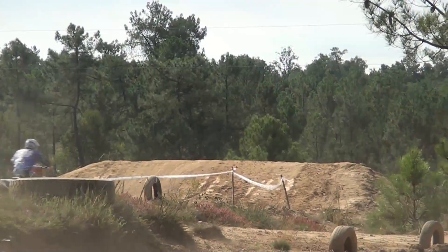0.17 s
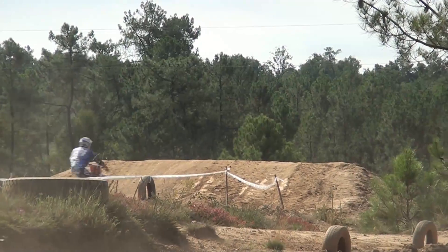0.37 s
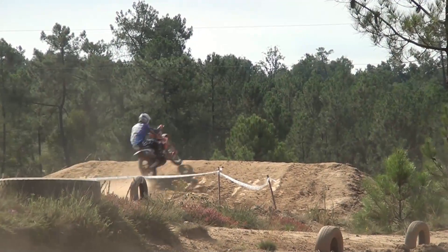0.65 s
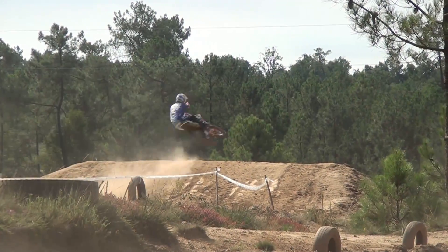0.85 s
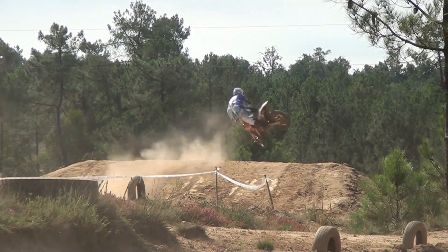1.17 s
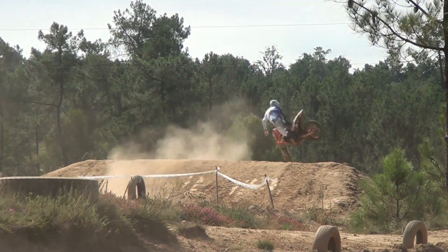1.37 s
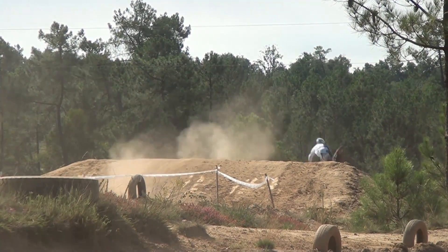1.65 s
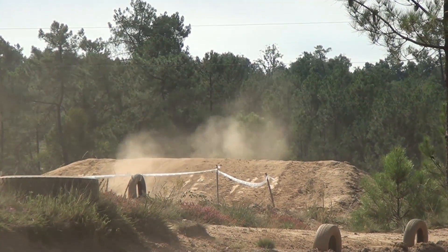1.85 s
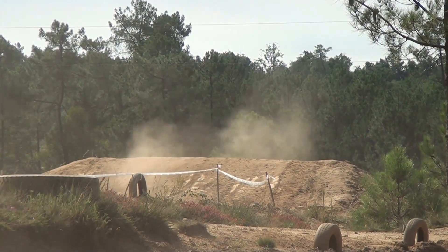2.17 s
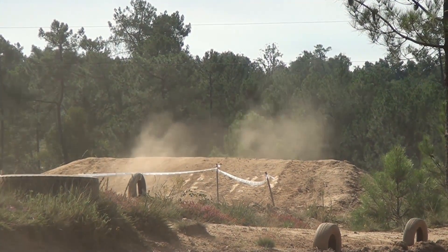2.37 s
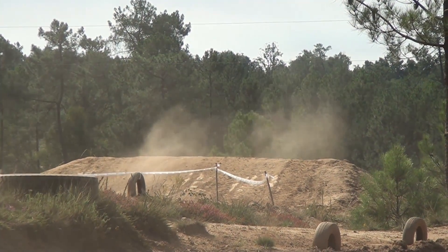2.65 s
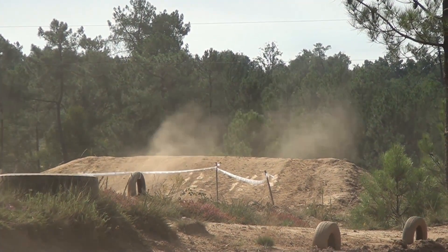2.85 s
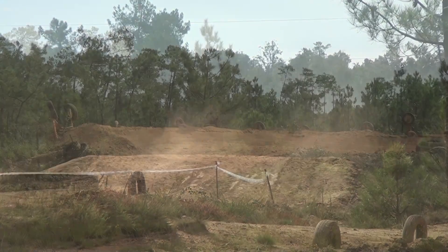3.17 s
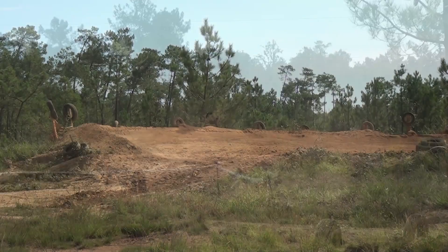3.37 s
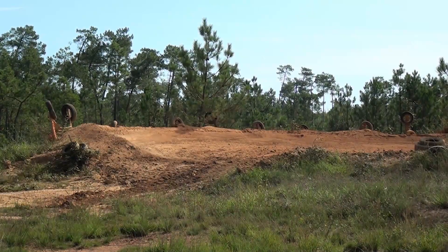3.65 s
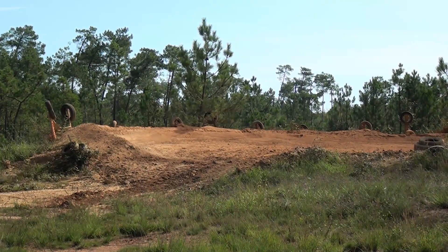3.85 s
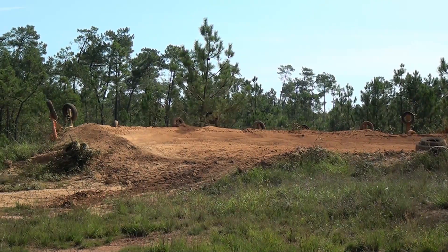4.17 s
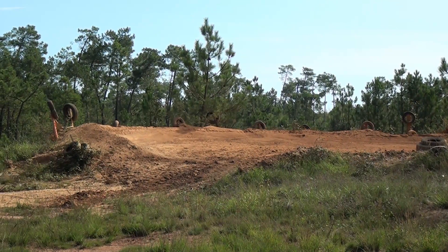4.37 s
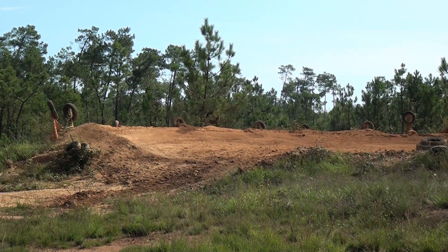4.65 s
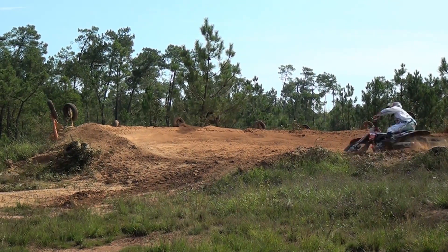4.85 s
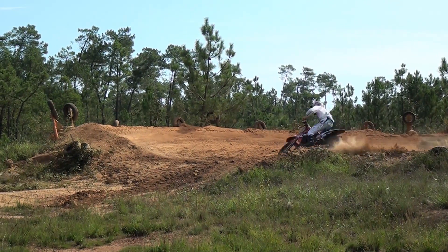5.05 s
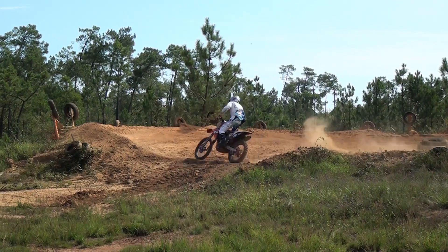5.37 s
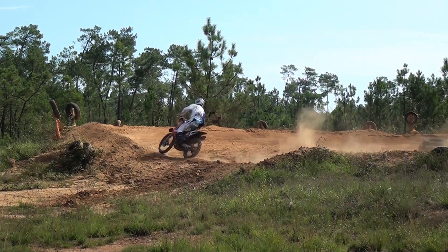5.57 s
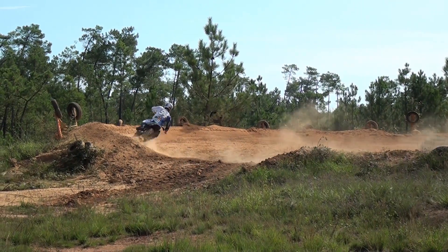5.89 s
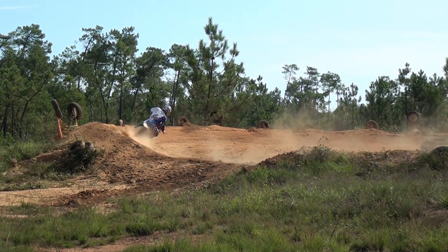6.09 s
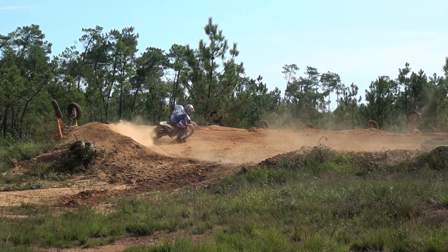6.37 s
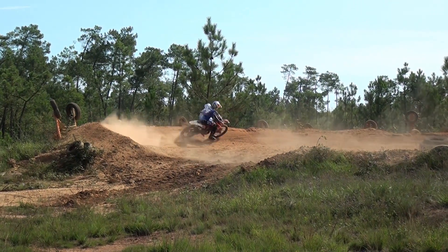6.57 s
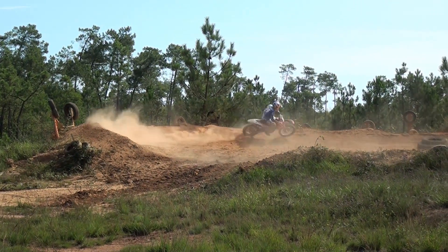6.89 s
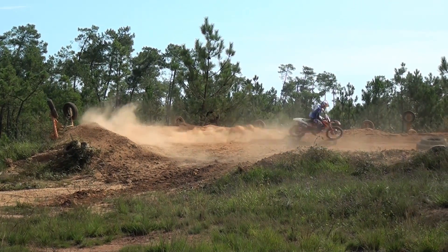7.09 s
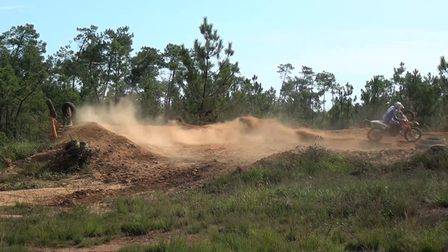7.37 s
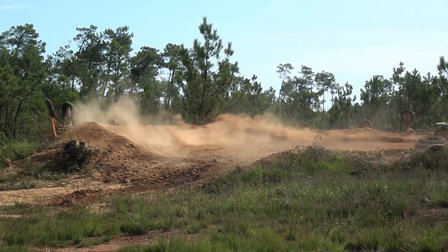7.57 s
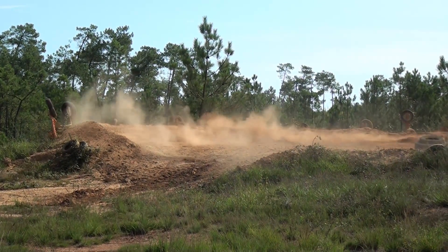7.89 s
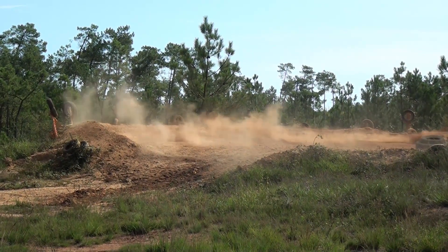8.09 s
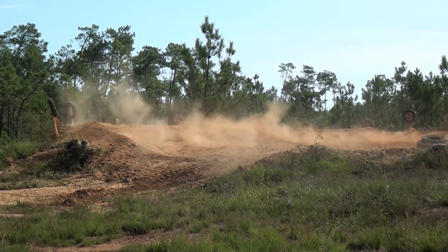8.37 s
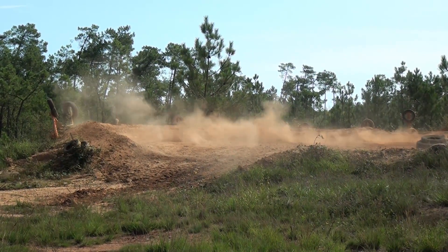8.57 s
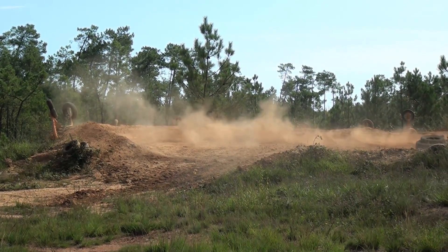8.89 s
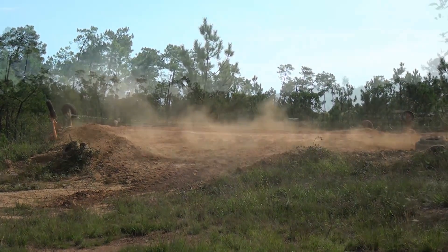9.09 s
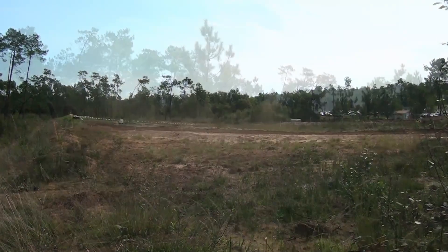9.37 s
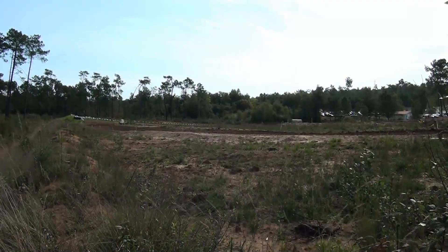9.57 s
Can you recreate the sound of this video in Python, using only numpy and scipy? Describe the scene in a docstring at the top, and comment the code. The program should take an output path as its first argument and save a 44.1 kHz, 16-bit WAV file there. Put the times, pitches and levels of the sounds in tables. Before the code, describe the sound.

A motocross bike passes outdoors in short throttle bursts, drops to a low rattling putter, then accelerates with a crackling rasp.

```python
"""A sandy track among pines, from a camera's stereo microphone: a single-cylinder dirt bike passes three times.
Every firing rings the exhaust pipe; with the throttle open it also cracks. Chain, tyres and thrown sand hiss,
and chain slaps and stones rattle. Under it all the engine's low hum holds steady with a light airy hiss; low
gusts rumble on the microphone."""
import sys
import numpy as np
from scipy import signal
from scipy.fft import rfft, irfft, next_fast_len
from scipy.io import wavfile
from scipy.ndimage import uniform_filter1d

SR = 44100
rng = np.random.default_rng(int(sys.argv[2]) if len(sys.argv) > 2 else 0)


def unload_audio(sound):
    """Save the sound as a 16-bit wav file, at the path given as the first command line argument."""
    columns = np.transpose(np.atleast_2d(sound))
    # keep every value between -1 and 1, then stretch to whole-number steps
    steps = np.round(np.clip(columns, -1, 1) * 32767)
    wavfile.write(sys.argv[1], SR, steps.astype(np.int16))


N = 429093


def gain_of(db):
    """Decibels to a factor."""
    return 10 ** (np.asarray(db) / 20)


def read(points, hz):
    """Reads a spectrum on a log-frequency axis."""
    f, value = np.transpose(points)
    return np.interp(np.log(hz + 1), np.log(f + 1), value)


def columns(rows, t):
    """Each column after the time column as a curve over t."""
    times, *rest = np.transpose(rows)
    return [np.interp(t, times, column) for column in rest]


def smooth(x, size):
    """Two running means of size samples."""
    return uniform_filter1d(uniform_filter1d(x, size), size)


def steady(x, size=6000):
    """Holds the running rms at 1 but keeps pulse-to-pulse differences."""
    return x / np.sqrt(abs(smooth(x ** 2, size)) + 1e-16)


def swelling(x, hold):
    """Level near 1; hold 0 keeps all of the slow swell, hold 1 none."""
    x = x / x.std()
    return x * abs(steady(x) / (x + 1e-30)) ** hold


def butter(x, order, hz, kind):
    """Causal Butterworth filter."""
    return signal.sosfilt(signal.butter(order, hz, kind, fs=SR, output="sos"), x)


def colour(x, points):
    """Causal filter with the given spectrum."""
    db = np.maximum(read(points, abs(np.fft.fftfreq(4096, 1 / SR))), -100)
    minimum_phase = np.exp(np.conj(signal.hilbert(np.log(gain_of(db)))))
    return signal.oaconvolve(x, np.fft.ifft(minimum_phase).real[:2048])[:len(x)]


def mode(x, hz, width_hz, db=0, count=2):
    """A fixed resonance; count 1 starts sharply, count 2 has steeper sides."""
    r = np.exp(-np.pi * width_hz / SR)
    section = [1 - r, 0, r - 1, 1, -2 * r * np.cos(2 * np.pi * hz / SR), r * r]
    return gain_of(db) * signal.sosfilt([section] * count, x)


def resonate(x, hz, width_hz, rise=6.4):
    """A resonance that follows hz and builds up rise times faster than it dies."""
    turn = np.exp(2j * np.pi * np.cumsum(hz) / SR)
    slow, fast = np.exp(-np.pi * width_hz * np.array([1, rise]) / SR)
    envelope = signal.lfilter([(1 - slow) * (1 - fast)], np.poly([slow, fast]), x / turn + 1e-18)
    return 2 * (turn * envelope).real


def throttle_at(t, shut_voice):
    """The throttle snaps open and rolls shut; returns its share of cracks in the treble, then the voice."""
    # The engine pulls, lugs or spins free in the air. Boom, bark and buzz are the low, upper and silencer
    # modes against the main one; nasal and bite are tail pipe modes against the cracks:
    # start_s, end_s, crack_share, boom_db, bark_db, buzz_db, bark_hz, nasal_db, bite_db
    bursts = [(-.1, 0.238, 0.75, -0.5, 8, -1.5, 280, -26, -40),
              (0.956, 1.101, 0.97, -3.5, 1, -19, 271, -9.5, -18),
              (1.1, 1.24, 0.87, -4.5, -5, -16, 321, -13, -5),
              (1.285, 2.07, 0.62, -11.5, -3, -24, 293.1, -22, -14),
              (2.103, 2.286, 0.91, -2, -1, -11, 284.8, -8, -9),
              (2.296, 2.547, 0.19, 1, -8, -15.5, 310, -13, -30),
              (2.55, 2.762, 0.17, 0, 3.5, -31, 270, -12, -20),
              (5.176, 5.358, 0.65, 4, 3, -18, 266.7, -8, -20),
              (5.381, 5.678, 0.32, 5.5, 5.5, -20, 250, -11, -22),
              (5.716, 5.863, 0.36, 0, -12, -27, 256.2, -21, -28),
              (5.902, 6.046, 0.21, -3.5, -10, -18, 276.8, -24, -27),
              (6.088, 6.2, 0.7, 0.5, 4, -7, 233, -9, -23), (6.217, 6.408, 0.5, -4, 4.5, -5.5, 239, -3, -21),
              (6.412, 6.586, 0.74, -2, 3.5, -3.5, 265.4, -5, -28),
              (6.587, 6.747, 0.74, 0.5, 5.5, -0.5, 293.5, -8, -23),
              (6.763, 7.199, 0.78, -1, 4.5, -23, 294.8, -10.5, -25),
              (7.208, 7.78, 0.87, -4, 3, -17, 287, -12, -12),
              (7.779, 8.44, 0.69, -4, 2, -16, 289.5, -18, -14),
              (8.515, 8.737, 0.61, -1.5, 3, -16, 307.8, -11, -8),
              (8.762, 9.045, 0.48, -2, -1, -10.5, 266, -35, -10.5),
              (9.075, 9.339, 0.32, -4, 2, -10.5, 276.6, -25, -16),
              (9.362, 9.503, 0.28, -6, -5, -8.5, 274.8, -21, -12.5)]
    open_s, shut_s, coasting_share = .02, .05, .15
    start, end, *opened = np.transpose(bursts)[:, :, None]
    gate = np.clip((t - start) / open_s, 0, 1) * np.clip((end - t) / shut_s + 1, 0, 1)
    gate = gate / np.maximum(gate.sum(0), 1)
    share, *voice = (shut + ((value - shut) * gate).sum(0)
                     for shut, value in zip((coasting_share, *shut_voice), opened))
    return np.clip(share, 0, .98), *voice


def firings(t, hz, throttle):
    """One thump and one crack a cycle, uneven when the engine lugs; cracks vary more than thumps."""
    # The engine stumbles on a jolt: time_s, timing_spread_cycles
    stumbles = [(1.255, .06), (2.5, .045), (5.24, .025)]
    at = np.flatnonzero(np.diff(np.floor(np.cumsum(hz) / SR)))
    timing, strength, sharpness = rng.standard_normal((len(at), 3)).T
    lugging = np.clip((72 - hz[at]) / 25, 0, 1) * np.clip(1 - throttle[at] / .6, 0, 1)
    jolts = sum(spread * np.clip(1 - abs(t[at] - s) / .05, 0, 1) for s, spread in stumbles)
    jitter_cycles = .002 + .035 * lugging + jolts
    at = np.clip(at + (jitter_cycles * timing * SR / hz[at]).astype(int), 0, len(t) - 1)
    thumps, cracks = np.zeros((2, len(t)))
    thumps[at] = gain_of((.4 + 60 * jitter_cycles) * strength)
    # The crack leaves as the pressure wave peaks, later at high revs.
    late_s = .003 + .005 * np.clip((hz[at] - 62) / 14, 0, 1)
    cracks[np.minimum(at + (late_s * SR).astype(int), len(t) - 1)] = thumps[at] * gain_of(.8 * sharpness)
    return thumps, cracks


def main_ring(flow, hz, throttle, revving, noise):
    """The main pipe mode sags with the revs, rises with hot gas and locks to 2 * hz at high revs."""
    wander = 1 + .07 * steady(smooth(noise, 1200), size=40000)
    cold_hz = 163.6 * (hz / 31.5) ** .12 * wander
    warm_hz = cold_hz + (203 - cold_hz) * (throttle / 1.44) ** 2
    ring_hz = (1 - revving) * warm_hz + revving * 2 * hz
    fast_ring = steady(resonate(flow, ring_hz, width_hz=39.4))
    lug_ring = steady(resonate(flow, ring_hz, width_hz=47.3, rise=1.44))
    return revving * fast_ring + (1 - revving) * lug_ring


def exhaust_pipe(t, hz, throttle, thumps, noise, boom_db, bark_db, buzz_db, bark_hz):
    """Thumps ring the pipe and silencer; levels are set against the main mode."""
    # Upper engine orders that stand out clean: time_s, firing_rate_multiple, level_db
    upper_orders = [(0, 6.3, -6), (.3, 7, -19.5), (.95, 8, -21), (1.05, 7.5, -12), (1.22, 6.8, -13),
                    (1.3, 6.5, -18), (1.6, 6.6, -9), (2.05, 8, -14), (2.2, 7, -11), (2.35, 6, -20),
                    (2.8, 7, -27), (3.3, 9, -24), (5.15, 12, -28), (5.2, 12.3, -7), (5.33, 12, -1),
                    (5.5, 11.8, -3), (5.67, 11.3, -4), (5.73, 12, -32), (6.09, 14, -27), (6.12, 14, -10),
                    (6.3, 12.3, -10), (6.55, 11.5, -9), (6.74, 10.5, -11), (6.8, 7.5, -12), (7.2, 7, -15.5),
                    (7.3, 5.2, -9), (7.47, 5.5, -8), (7.62, 5.5, -6), (7.7, 7.5, -13), (7.8, 7, -18),
                    (7.9, 5.7, -10), (8.15, 6, -12), (8.25, 5.5, -8.5), (8.44, 5.5, -10), (8.5, 5.5, -13),
                    (8.66, 5.6, -9), (8.8, 6.5, -17), (9, 7, -18), (9.25, 6, -12), (9.5, 6, -16),
                    (9.73, 6, -16)]
    # Low pipe modes: pitch_hz, width_hz, level_db
    boom_modes = [(59.3, 21, -11), (92.4, 78, 15), (108.4, 41, 6)]
    # Thrum at the firing rate itself: time_s, level_db
    thrum_levels = [(0, -27), (3.3, -16), (3.6, -12), (4.2, -12), (4.6, -16), (5.1, -14), (5.5, -12),
                    (6.1, -27), (6.5, -18), (6.8, -6.5), (7.15, -9), (7.3, -26), (9.73, -12)]
    # Silencer modes: pitch_hz, width_hz, level_db
    silencer_modes = [(408, 65, 9.5), (485, 62, 17), (596, 29, 11), (647.3, 28, 15), (757, 86, 9)]
    flow = thumps + .0092 * noise[0]  # turbulence fills the gaps between harmonics
    revving = np.clip((hz - 54) / 10, 0, 1)
    pipe = main_ring(flow, hz, throttle, revving, noise[2])
    multiple, hum_db = columns(upper_orders, t)
    hum = resonate(thumps, multiple * hz, width_hz=162, rise=1.25)
    pipe += gain_of(hum_db) * steady(resonate(hum, multiple * hz, width_hz=162, rise=1.4))
    pipe += gain_of(columns(thrum_levels, t)[0]) * steady(resonate(resonate(flow, hz, 30), hz, 30))
    second_harmonic = steady(resonate(resonate(flow, 2 * hz, 25), 2 * hz, 27))
    pipe += gain_of(-15.5) * (1 - revving) * second_harmonic
    # Boom and bark swell as a harmonic crosses them.
    pipe -= gain_of(boom_db) * swelling(sum(mode(flow, *m) for m in boom_modes), hold=.39)
    bark = revving * resonate(flow / hz, bark_hz, 37) + (1 - revving) * resonate(flow / hz, bark_hz, 66)
    pipe -= gain_of(bark_db) * swelling(bark, hold=.083)
    buzz = sum((-1) ** k * mode(thumps + .003 * noise[1], *m) for k, m in enumerate(silencer_modes))
    pipe += gain_of(buzz_db) * steady(buzz)
    # At low revs each thump comes back off the bank about 8 ms later.
    return steady(pipe + .23 * (1 - revving) * np.roll(pipe, round(.0081 * SR)))


def cracks_and_hiss(throttle, cracks, noise, treble, bounce):
    """Exhaust cracks blend with the hiss of chain, tyres and sand; returns bands below and above 3 kHz."""
    # A gas jet follows each valve opening.
    jet = signal.lfilter([1], [1, -np.exp(-1 / (.003 * SR))], cracks) * noise[1]
    flicker = gain_of(2 * steady(uniform_filter1d(noise[0], size=700)))
    hiss = steady(noise[2] * flicker)
    dip_spacing_hz, echo_gain = bounce
    delay, bands = round(SR / dip_spacing_hz), []
    # Sand hiss rules the top band unless the throttle is wide open.
    for share, crack_gain, kind in (throttle, 11, "low"), (throttle ** 2, 6, "high"):
        drive = np.sqrt(share) * steady(jet - crack_gain * cracks) + np.sqrt(1 - share) * hiss
        drive[delay:] -= echo_gain * drive[:-delay]  # the sand returns an inverted echo
        bands.append(steady(butter(colour(drive, treble), 3, 3000, kind)))
    return bands


def tail_pipe(t, cracks, low_band, noise, modes, nasal_db, bite_db):
    """Cracks ring the tail pipe: three fixed modes and a moving snarl, also fed by the low band."""
    # The loudest tail pipe mode, shifting with the bike's heading: time_s, pitch_hz, level_db
    snarl_path = [(0.0, 1700, -13), (0.13, 1820, -5), (0.27, 1500, -15), (0.7, 1770, -8), (0.81, 2120, -6),
                  (1.05, 1649, -5.5), (1.3, 2083, -6), (1.32, 1770, -16), (1.67, 1480, -10),
                  (1.81, 2051, -9), (2.27, 1525, -14), (2.46, 1803, -8), (2.51, 1633, -22),
                  (4.35, 1510, -15), (4.51, 1800, -6), (5.37, 1602, -22.5), (6.16, 1950, -6),
                  (6.37, 1420, -14), (6.67, 1733, -26), (6.72, 1440, -35), (7.0, 1780, -21),
                  (7.05, 1479, -11), (7.29, 1504, -8), (7.38, 1740, -5), (7.62, 1525, -20),
                  (7.78, 1778, -6), (7.83, 1446, -11), (8.08, 1534, -23), (8.13, 1821, -5),
                  (8.48, 1460, -26), (8.62, 1680, -5), (8.73, 1450, -7), (8.83, 1896, -7), (8.97, 1480, -7),
                  (9.02, 1696, -6), (9.7, 1598, -28)]
    soft_cracks = butter(.004 * noise - cracks, 2, 4500, "low")
    nasal, bite, edge = (steady(mode(soft_cracks, *m, count=1)) for m in modes)
    snarl_hz, snarl_db = columns(snarl_path, t)
    snarl = steady(resonate(.55 * low_band + steady(soft_cracks), snarl_hz, width_hz=440, rise=1.8))
    fixed_modes = gain_of(nasal_db) * nasal + gain_of(bite_db) * (bite + gain_of(3) * edge)
    return gain_of(snarl_db) * snarl + fixed_modes


def bike_pass(revs, pipe_levels, rasp_levels, shut_voice, treble, tail_modes, bounce, fade_s=.06):
    """One pass, the pipe's ring under a rasp of cracks and hiss; returns its first sample and sound."""
    # The band above 3 kHz, lower when the bike is far or behind the bank: time_s, level_db
    top_levels = [(0, -6), (.25, -9.5), (.6, -16.5), (1, 0.5), (1.13, 4), (1.23, 2), (1.4, 3.5), (1.8, 0),
                  (2.1, -5.5), (2.2, -5), (2.3, -6), (2.7, -8), (3.3, -10), (4.2, -8), (5.15, -3.5),
                  (5.25, -10), (5.4, -3), (5.9, -3.5), (6.1, -5), (6.8, -9), (7.4, -3.5), (8.4, -8.5),
                  (9.2, -12), (9.73, -14)]
    start_s, end_s = pipe_levels[0][0], pipe_levels[-1][0]
    t = np.arange(max(start_s - fade_s, 0), min(end_s + fade_s, N / SR), 1 / SR)
    hz, pipe_db, rasp_db, top_db = (
        columns(rows, t)[0] for rows in (revs, pipe_levels, rasp_levels, top_levels))
    throttle, *pipe_voice, nasal_db, bite_db = throttle_at(t, shut_voice)
    thumps, cracks = firings(t, hz, throttle)
    noise = rng.standard_normal((3, len(t)))
    pipe = exhaust_pipe(t, hz, throttle, thumps, noise, *pipe_voice)
    low, high = cracks_and_hiss(throttle, cracks, noise, treble, bounce)
    tail = tail_pipe(t, cracks, low, noise[2], tail_modes, nasal_db, bite_db)
    sound = gain_of(pipe_db) * pipe + gain_of(rasp_db) * (low + tail + gain_of(top_db) * high)
    fade_in = np.clip((t - start_s) / fade_s / 2 + .5, 0, 1) if start_s > 0 else 1
    fade_out = np.clip((end_s - t) / fade_s / 2 + .5, 0, 1) if t[-1] + fade_s < N / SR else 1
    return round(t[0] * SR), sound * np.sqrt(fade_in * fade_out)


def dirt_bike():
    """Three passes of the bike, each fading into the next."""
    # Engine speed, a table a pass: time_s, firing_hz
    revs = [
        [(0.0, 88.9), (0.11, 84.2), (0.2, 88.4), (0.26, 78.6), (0.39, 65.8), (0.6, 61.46), (0.78, 69.7),
         (0.9, 67.8), (0.99, 77.5), (1.18, 112.1), (1.24, 121.7), (1.33, 114.5), (1.67, 88.94), (2.06, 63.92),
         (2.12, 67.2), (2.28, 101.7), (2.39, 114), (2.49, 120), (2.54, 97.9), (2.6, 81.85), (2.75, 86.4),
         (2.89, 78.4), (3.03, 66.35), (3.3, 67.2)],
        [(3.3, 53.7), (3.42, 52.4), (3.77, 36.7), (3.87, 43.4), (4.17, 41.3), (4.3, 33.2), (4.46, 40.72),
         (4.61, 44.25), (4.84, 38.33), (4.96, 33.02), (5.05, 44.55), (5.17, 50.92), (5.31, 55.68),
         (5.39, 51.67), (5.5, 53.5), (5.6, 49.43), (5.67, 54.63), (5.76, 43.13), (5.9, 38.07), (6.05, 30.23),
         (6.1, 33), (6.13, 41.4), (6.16, 45.02), (6.22, 46.47), (6.38, 49.72), (6.54, 50.85), (6.66, 55.28),
         (6.82, 65.2), (6.87, 62.58), (6.92, 66.67), (6.96, 64.4), (7.08, 67.06), (7.14, 72.3), (7.2, 63.65),
         (7.24, 78.6), (7.3, 91.1), (7.34, 80), (7.37, 74.34), (7.44, 99.24), (7.46, 99.5), (7.525, 84.3),
         (7.605, 101.4), (7.665, 88.5), (7.73, 85.34), (7.785, 84.7), (7.81, 88), (7.89, 104.2), (7.945, 101.2),
         (8.0, 104), (8.05, 96.1), (8.09, 94.8), (8.155, 87.34), (8.24, 96.4), (8.3, 92.1), (8.38, 95.16),
         (8.445, 106.8), (8.53, 95.8), (8.58, 99.7), (8.65, 111.6), (8.68, 112), (8.73, 90.96), (8.8, 82.44),
         (8.87, 83.76), (9.02, 90.4), (9.07, 90.56), (9.12, 94.2), (9.17, 94.55), (9.26, 99.2), (9.31, 93),
         (9.37, 94.6), (9.45, 88.5), (9.52, 82.4)],
        [(9.52, 79.7), (9.616, 97.5), (9.73, 77.4)],
    ]
    # The pipe at the microphone, a table a pass: time_s, level_db
    pipe_levels = [
        [(0, -14.5), (.22, -15.5), (.28, -21.5), (.5, -28), (.9, -24), (.99, -16), (1.15, -17.5), (1.24, -17.5),
         (1.31, -18), (1.6, -33.5), (1.76, -33.5), (1.8, -33.5), (2.09, -35.5), (2.14, -26), (2.27, -16.5),
         (2.57, -25), (2.7, -22), (2.76, -31.5), (2.8, -37), (3.11, -37), (3.4, -33)],
        [(3.4, -30), (3.57, -26), (3.98, -29.5), (4.28, -25), (4.33, -22.5), (4.45, -22.5), (4.66, -20),
         (4.83, -21), (5.03, -20.5), (5.12, -15.5), (5.2, -19.5), (5.36, -20.5), (5.68, -21), (5.72, -12.5),
         (5.88, -20.5), (6.09, -19), (6.11, -17), (6.2, -17.5), (6.35, -13.5), (6.76, -20), (6.88, -17),
         (7.03, -19.5), (7.15, -14.5), (7.7, -17.5), (8.33, -16.5), (8.43, -14), (8.49, -17.5), (8.56, -15.5),
         (8.68, -13.5), (8.74, -17.5), (9.13, -14.5), (9.37, -22), (9.52, -29)],
        [(9.52, -27.5), (9.718, -36), (9.73, -15)],
    ]
    # Cracks and hiss, a table a pass: time_s, level_db
    rasp_levels = [
        [(0.0, -18.5), (0.01, -28.5), (0.18, -27.5), (0.41, -44), (0.84, -44), (0.94, -40), (0.98, -29),
         (1.1, -27.5), (1.2, -25), (1.26, -25), (1.27, -27.5), (1.61, -31.5), (2.01, -44.5), (2.09, -54),
         (2.14, -32), (2.22, -27.5), (2.27, -30.5), (2.31, -35.5), (2.62, -44.5), (2.72, -40), (3.06, -56),
         (3.4, -79)],
        [(3.4, -50), (3.64, -45), (3.67, -37.5), (3.69, -52.5), (4.29, -38), (4.32, -28.5), (4.44, -34),
         (4.47, -26), (4.51, -31), (5.17, -33), (5.21, -29.5), (5.235, -30), (5.25, -27.5), (5.3, -26),
         (5.34, -29), (5.67, -29), (6.09, -38.5), (6.105, -33), (6.15, -33.5), (6.2, -33.5), (6.24, -33),
         (6.79, -23), (7.37, -23), (8.38, -24.5), (8.5, -30.5), (8.67, -22.5), (8.79, -26), (8.97, -25),
         (9.31, -30.5), (9.52, -42.5)],
        [(9.52, -47), (9.728, -41), (9.73, -41)],
    ]
    # Throttle shut, a row a pass: boom_db, bark_db, buzz_db, bark_hz, nasal_db, bite_db
    shut_voices = [(-24, -13.5, -37, 271.6, -24, -37), (-11, -20, -22.5, 315, -22, -39),
                   (21, 13.5, 14.5, 320, -0.5, -22)]
    # Treble colour with the dips of the ground bounce, first pass and later ones: frequency_hz, level_db
    trebles = [
        [(410, -7), (700, 7), (873, -3), (1060, 6), (1240, -1), (1470, 5), (1870, -4), (2190, 4), (2490, -5.5),
         (2690, 0), (2990, -3.5), (3320, 0), (3800, -6.5), (4400, -6), (6500, -13), (8320, -12.5), (15500, -37)],
        [(410, -15.5), (700, -4.5), (818, -11), (968, -6), (1150, -8.5), (1340, -2.5), (1850, -7.5),
         (2250, -7.5), (2990, -9), (3870, -9), (5000, -7.5), (6420, -11.5), (8210, -10), (10800, -18),
         (12600, -30.5), (14000, -29.5), (15500, -38)],
    ]
    # Nasal, bite and edge modes of the tail pipe, first pass and later ones: pitch_hz, width_hz
    tail_modes = [
        [(760, 170), (1480, 150), (3280, 1340)],
        [(975, 59), (1750, 180), (2980, 890)],
    ]
    # Echo off the ground, a row a pass: dip_spacing_hz, echo_gain
    bounces = [(620, 0.024), (1140, 0.0052), (1140, 0.081)]
    track = np.zeros(N)
    for k, tone in enumerate((0, 1, 1)):
        start, sound = bike_pass(revs[k], pipe_levels[k], rasp_levels[k], shut_voices[k],
                                 trebles[tone], tail_modes[tone], bounces[k])
        track[start:start + len(sound)] += sound[:N - start]
    return track


def background():
    """The bike's low engine hum held steady under everything, peaking near 144 Hz, with a light airy hiss:
    coloured noise, mostly shared by both channels."""
    # The background's spectrum: frequency_hz, level_db
    spectrum = [(15, -49), (25, -29), (93, -38.5), (144, -0.5), (433, -11.5), (703, -12.5), (919, -21.5),
                (1660, -21), (11500, -44.5), (15500, -53)]
    shared, left, right = rng.standard_normal((3, N))
    both = np.array([colour(shared + .072 * left, spectrum), colour(shared + .45 * right, spectrum)])
    return gain_of(-38.5) * both / both.std()


def rattles():
    """The chain slaps and stones fly: short bursts of bright grit with a quick rise."""
    # Chain slaps and thrown stones: start_s, level_db
    hits = [(2.721, -29), (3.3789, -40), (3.6665, -40), (4.3181, -20), (4.336, -29), (4.4096, -15.5),
            (4.4618, -21), (4.586, -17.5), (4.6889, -23), (4.8392, -15.5), (4.853, -20), (4.918, -14.5),
            (5.355, -16.5), (5.9515, -14.5), (5.9889, -13.5)]
    rise_s, t60_s = .0015, .03
    out, t = np.zeros(N), np.arange(5000) / SR
    for start_s, level_db in hits:
        grit = butter(rng.standard_normal(len(t)), 4, [1890, 10000], "band")
        envelope = gain_of(level_db - 60 * t / t60_s) * np.minimum(t / rise_s, 1)
        out[round(start_s * SR):][:len(t)] += envelope * grit
    return out


def gusts():
    """Wind buffets the microphone: a low lumpy rumble, unrelated at its two ports."""
    # Wind on the microphone: time_s, level_db
    wind_levels = [(0, -71), (3, -55), (3.7, -61), (5, -49), (6.9, -52), (7.5, -64), (9.2, -58),
                   (9.73, -52)]
    rumble, lumps = rng.standard_normal((2, 2, N))
    rumble = butter(rumble, 2, (24, 60), "band")
    lumps = smooth(lumps, 4000)
    level_db = columns(wind_levels, np.arange(N) / SR)[0] + 11 * lumps / lumps.std()
    return gain_of(level_db) * rumble / rumble.std()


def placed(x, waver_db=2.0, apart_db=.65):
    """Sends the bike left or right; moving air makes patches above the bass swell and fade."""
    # The bike's bearing from the microphone: time_s, leftward_amount
    bearing = [(0.0, 0.5), (0.38, 0.5), (2.93, 0.0), (3.44, -2), (4.14, -0.5), (6.04, 0.5), (7.24, 0.0),
               (9.73, -1.5)]
    # How strongly bearing shows between the channels: frequency_hz, db_per_unit_bearing
    spread = [(100, 0.19), (300, 3.4), (1000, 0.46), (2000, 1.1), (5000, 1.5)]
    hz, t, spectra = signal.stft(x, SR, nperseg=1024)
    patches = rng.standard_normal((len(t), len(hz), 2)).T
    patches = uniform_filter1d(uniform_filter1d(patches, size=7, axis=1), size=10, axis=2)
    both, apart = patches / patches.std() * np.clip(hz / 700 - .5, 0, 1)[:, None]
    tilt_db = read(spread, hz)[:, None] * columns(bearing, t)[0] / 2 + apart_db * apart
    spectra = spectra * gain_of(waver_db * both)
    return signal.istft(spectra * gain_of([tilt_db, -tilt_db]), SR, nperseg=1024)[1][:, :N]


def scene():
    """The bike and its rattles out on the track, a steady engine hum and hiss under it, gusts at the
    microphone."""
    return placed(rattles() + dirt_bike()) + background() + gusts()


def record(dry):
    """The camera's two microphone ports differ slightly in phase and lose the deepest bass and the top."""
    # Phase between the ports: frequency_hz, left_lead_rad
    port_phase = [(40, -0.48), (300, -0.35), (600, -0.24), (1100, -0.16), (2200, -0.44), (4000, -0.052)]
    bass_cut_hz, ceiling, top_hz = 44, .93, 15750
    size = next_fast_len(N + 4096)
    turn = np.exp(.5j * read(port_phase, np.fft.rfftfreq(size, 1 / SR)))
    ports = irfft(rfft(dry, size) * np.array([turn, 1 / turn]), size)[:, :N]
    ports = butter(ports, 3, bass_cut_hz, "high")
    ports = ports / (1 + (ports / ceiling) ** 4) ** .25  # the input stage rounds off the tallest cracks
    return signal.oaconvolve(ports, signal.firwin(1023, top_hz, window=("kaiser", 9), fs=SR)[None], "same")


dry = scene()
out = record(dry)
unload_audio(out)
```